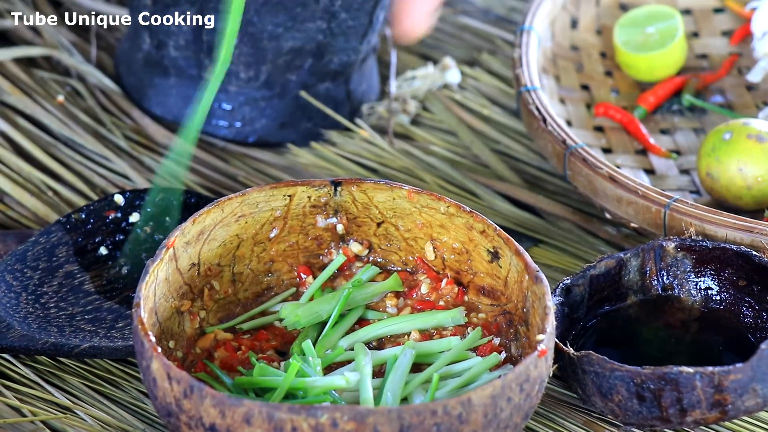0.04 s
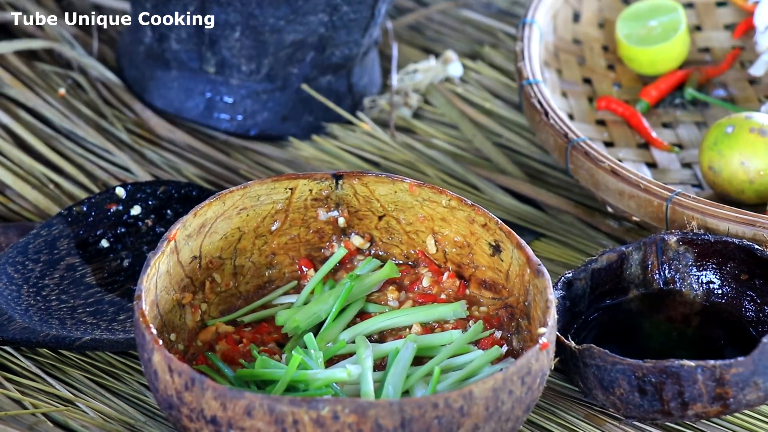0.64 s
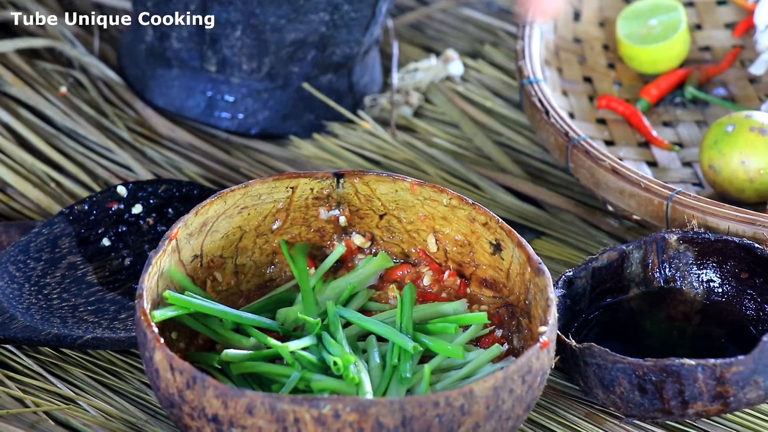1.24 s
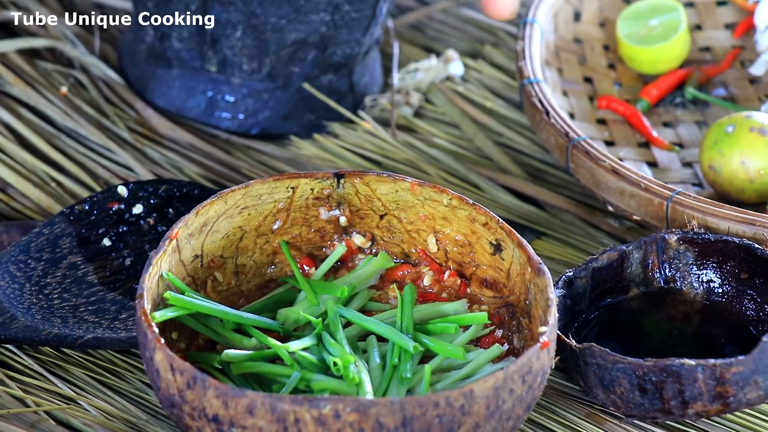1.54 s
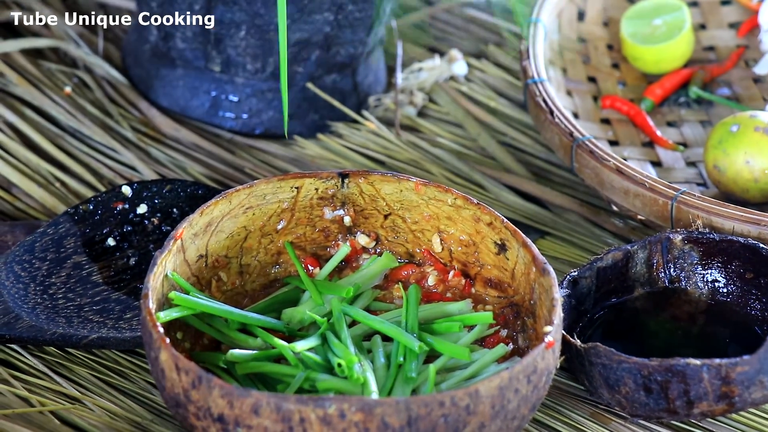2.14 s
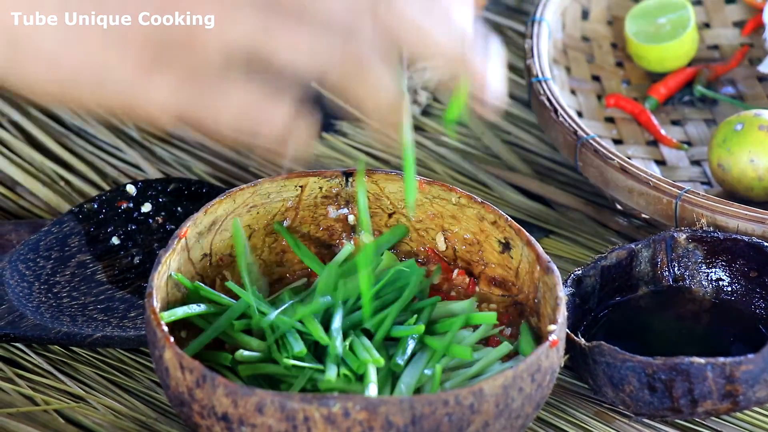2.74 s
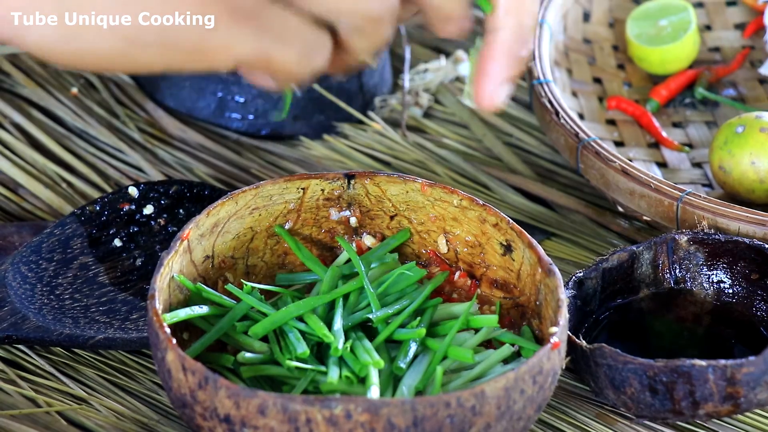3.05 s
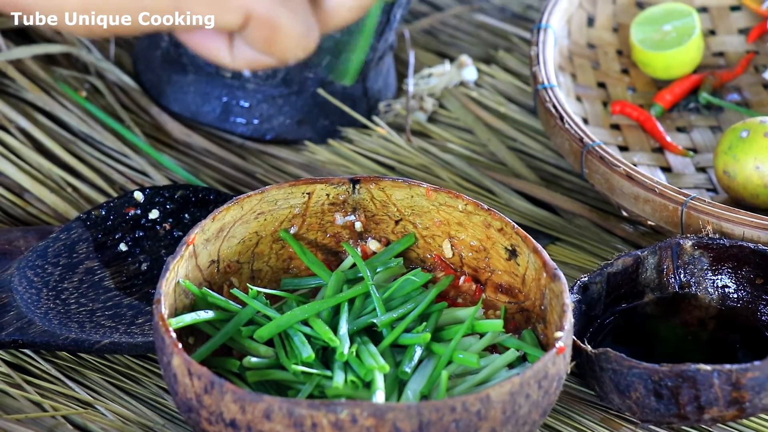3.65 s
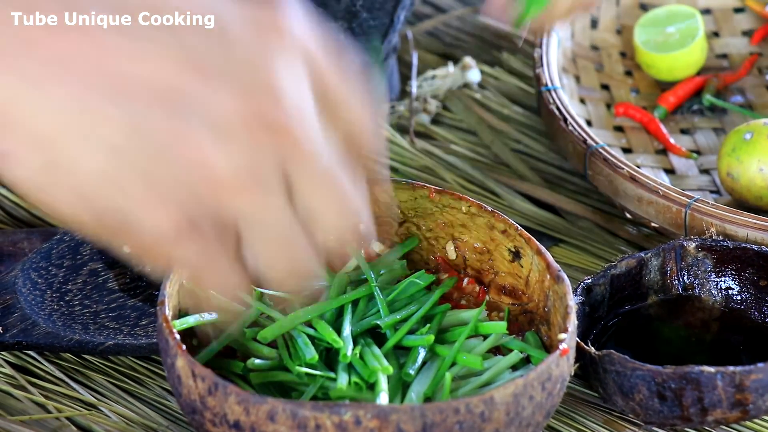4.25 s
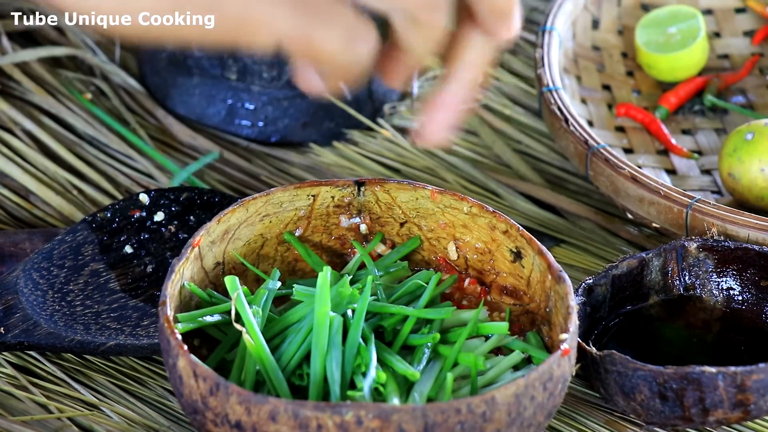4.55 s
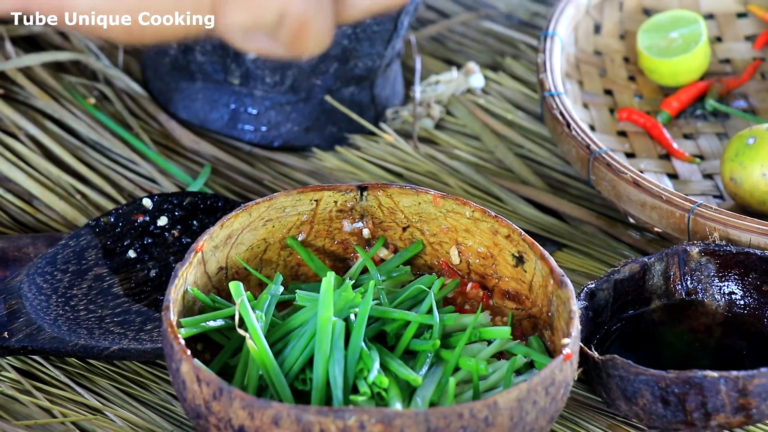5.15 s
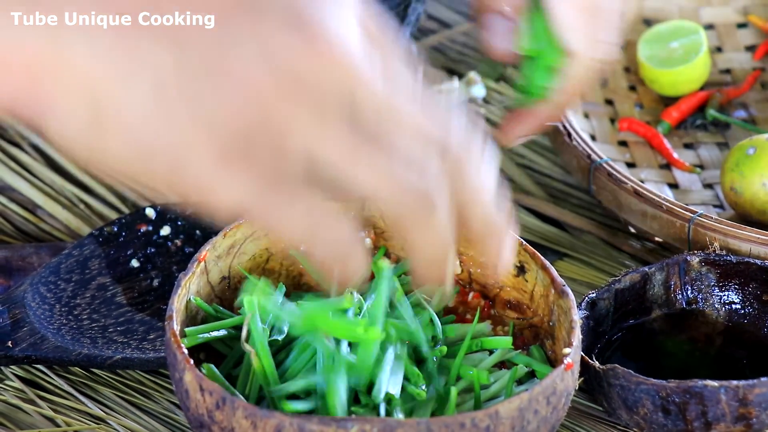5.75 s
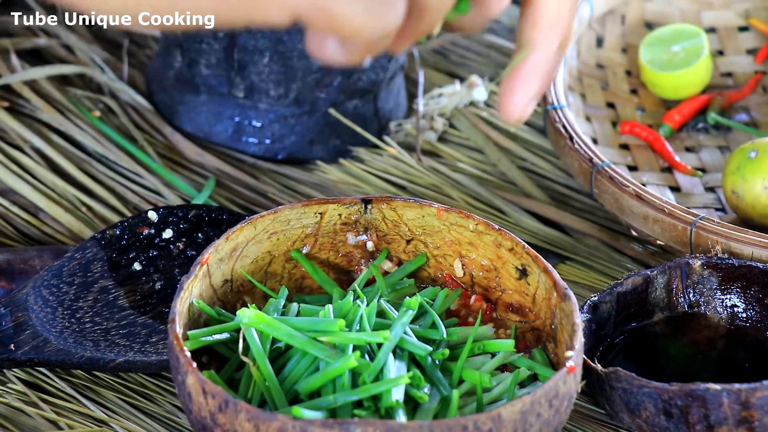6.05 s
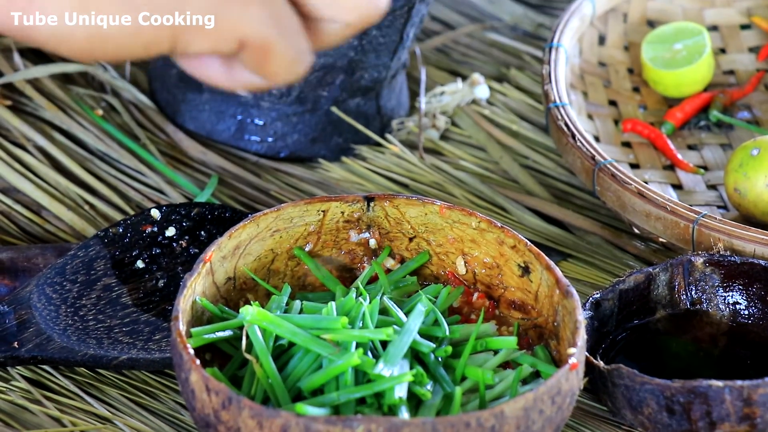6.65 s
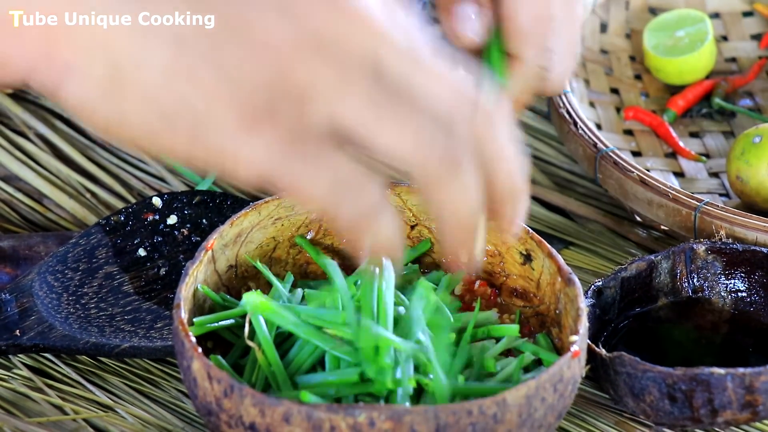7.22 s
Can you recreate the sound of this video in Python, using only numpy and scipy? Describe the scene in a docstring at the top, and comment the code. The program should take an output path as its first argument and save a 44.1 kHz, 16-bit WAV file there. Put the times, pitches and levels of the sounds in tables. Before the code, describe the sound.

A blade slices a hand-held bunch of spring onions outdoors, close to a stereo microphone. Five short cuts come at about 0.5, 1.8, 3.8, 5.1 and 6.7 seconds, each a rasp breaking into bright cracks and small hollow pops. The second crackles on until 2.4 seconds; the fourth carries a slight wet squeak. Between cuts come faint leafy rustles and dull hand bumps. Pieces and the blade tap a coconut-shell bowl on the right, most clearly around 3.4, 4.5, 5.8, 6.6 and 7.2 seconds.

In the trees, slightly right and quieter than the cutting, a songbird warbles and trills through the first 1.2 seconds, then whistles and chirps from 3.2 to 5.2. Another bird pipes evenly from 6.8 seconds. Faint distant chirps and a low breeze continue throughout, with soft puffs on the microphone at the start and around 1.6, 1.9 and 3.5 seconds.

```python
"""Spring onions are sliced in the hand over a coconut-shell bowl, outdoors, close to a stereo microphone.
The blade rasps through the bunch, hollow stalks crackle and snap, and cut pieces tap the shell on the right.
Off in the trees a songbird whistles varied phrases, another pipes, and far birds chatter.
Moving air rumbles softly all around and now and then puffs on the microphone."""
import sys
import numpy as np
from scipy import signal
from scipy.fft import rfft, irfft, next_fast_len
from scipy.io import wavfile
from scipy.ndimage import uniform_filter1d, map_coordinates

SR = 44100
rng = np.random.default_rng(int(sys.argv[2]) if len(sys.argv) > 2 else 0)


def store_pcm(level_fs):
    """Save levels as 16-bit WAV."""
    pcm = np.round(np.clip(level_fs, -1, 1) * 32767).astype(np.int16)
    wavfile.write(sys.argv[1], SR, np.atleast_2d(pcm).T)


N = 329868

# The blade's passes through the bunch, close up: (start [s], length [s], level [dB])
BLADE_PASSES = [(.497, 0.26, -39.5), (1.805, 0.29, -45), (3.774, .27, -44.5), (5.111, .22, -45),
                (6.675, 0.21, -50.5)]
# Soft hissy swells between cuts, leaf rustle and, near 3.26 s, a bird's high twitter:
# (middle [s], length [s], level [dB])
HISSY_SWELLS = [(.27, .16, -49), (1.04, 0.045, -47), (1.42, 0.18, -46.5), (1.66, .08, -50),
                (2.66, 0.12, -50.5), (3.26, 0.14, -46.5), (3.66, 0.22, -50), (5.44, 0.11, -50),
                (6.35, .07, -49)]
# Faint rustle of the held bunch: (time [s], level [dB])
HAND_RUSTLE = [(0, -56.5), (.9, -52.5), (1.4, -58.5), (4.7, -58.5), (7.48, -62.5)]
# Tearing cells: (frequency [Hz], level [dB])
RASP_SPECTRUM = [(300, -4.5), (900, -16.5), (2500, 4), (4800, -2), (7000, 2.5), (9000, 1.5), (12000, -2.5),
                 (16000, -11)]

def rasp(bite_s=0.081, ease_db_per_s=12.5, ruptures_per_s=1400):
    """The blade tears cells in clumps of tiny ruptures; a softer hiss swells between passes."""
    t = np.arange(N) / SR
    force = np.maximum(amp(curve(HAND_RUSTLE)), swells(HISSY_SWELLS))
    for start, length, db in BLADE_PASSES:
        contact = np.clip(np.minimum(t - start, start + length - t) / bite_s + .5, 0, 1)
        drag = amp(db - ease_db_per_s * np.clip(t - start, 0, length))
        force = np.maximum(force, contact * drag)
    sizes = spread(noise(), 0.28) * amp(2.8 * np.clip(rng.standard_normal(N), -2, 2))
    ruptures = unit(sizes * (rng.random(N) < ruptures_per_s / SR))
    grains = amp(-8) * ruptures + amp(-3.5) * spread(noise(), 0.34)
    clumps = amp(2.7 * wobble(260) + 1.7 * wobble(50))
    return amp(6) * force * coloured(grains * clumps, RASP_SPECTRUM) * pan(-1.6)


def crackles(per_s=45, boost_db=18.5, growth_db=6.5, scatter_db=3.5, crumble_db=-18):
    """Thin stalks give way at random, harder as the blade sinks in: rows like STALK_SNAPS."""
    rows = []
    for start, length, db in BLADE_PASSES:
        chance = rng.standard_normal((40, 3))
        count = round(length * per_s)
        for k, (slip, size, hollow) in enumerate(chance[:count]):
            depth = (k + .5 + 0.28 * slip) / count
            level = db + boost_db + growth_db * depth + scatter_db * size
            rows.append((start + depth * length, level, -17 + 6 * hollow, crumble_db))
    return rows


# Thick stalks snapping just in front of the microphone: (time [s], level [dB], pop [dB], crumble [dB])
STALK_SNAPS = [(0.5572, -14.5, -4.5, -22), (0.6198, 5.5, -20, -36), (0.659, -16, -21, -24),
               (0.682, -6.5, -35, -36), (.687, -7.5, -36, -19), (0.7165, -11.5, -30, -10),
               (.726, -5, -40, -21), (.7372, -15.5, -9, -10.5), (0.7431, -2, -24, -16),
               (1.628, -12, -14, -17), (1.9657, -16, -9.5, -15), (2.0295, -24.5, -6.5, -13),
               (2.045, -4, -23, -26), (2.0842, -5, -34, -27), (2.1, -10, -34, -14.5),
               (2.1073, -3.5, -45, -40), (2.1157, -2.5, -29, -23.5), (2.1605, -6, -24, -24.5),
               (2.2905, -20.5, -13, -13.5), (2.2989, -13, -17, -25), (2.3433, -17, -28, -12),
               (2.3622, -5.5, -36, -17.5), (2.367, -9.5, -38, -16.5), (2.3729, -10.5, -14, -17),
               (3.873, -13, -25, -20), (3.9724, -4, -45, -21), (3.9888, -14.5, -19, -11),
               (4.006, -11.5, -37, -17), (4.028, -14, -25, -18), (4.0329, -4.5, -19.5, -23.5),
               (5.244, -8, -34, -22), (5.366, -17, -33, -21), (5.3775, -13, -33, -22),
               (5.409, -22.5, -27, -11), (5.4258, -1, -35, -20), (5.4314, -2.5, -31, -21.5),
               (6.737, -24.5, -9.5, -12), (6.8362, -22.5, -22, -14.5), (6.89, -11.5, -27, -30),
               (6.913, -5, -39, -31)]
# The bright crack: (frequency [Hz], level [dB])
CRACK_SPECTRUM = [(400, -10.5), (1200, -16.5), (3000, -4.5), (4800, -5), (6500, 2), (8300, 4.5),
                  (11000, -3.5), (16000, -7.5)]
# The hollow pop: (frequency [Hz], level [dB])
POP_SPECTRUM = [(300, -25.5), (800, -2.5), (1300, 3), (3000, 2), (5000, -8), (10000, -11.5)]

def snaps():
    """Each stalk gives way with a bright crack, and its hollow tube adds a lower pop."""
    out = np.zeros((2, N))
    crack, pop = impulse(CRACK_SPECTRUM), impulse(POP_SPECTRUM)
    for s, db, pop_db, crumble_db in STALK_SNAPS + crackles():
        click = crack + amp(pop_db + 6.5) * pop
        push = fracture(t60=0.035, crumble_db=crumble_db, alike=0.29, lead_in_s=0.0037)
        burst = amp(db - 1.5) * signal.fftconvolve(push, click[None])
        add(out, s - .0094, burst, pan_db=rng.normal(-0.5, 2))
    return out


def fracture(t60, crumble_db, alike, lead_in_s):
    """One sharp push, 10 ms in, amid a crumble of tiny ones that builds up and dies away."""
    t = (np.arange(SR // 12) - SR // 100) / SR
    swell_db = -60 * np.where(t < 0, -t / lead_in_s, t / t60)
    push = spread(noise(len(t)), alike)
    push *= amp(crumble_db + swell_db + 5.2 * rng.standard_normal(len(t)))
    push[:, t == 0] += 1
    return push


# Cut pieces and the blade tapping the bowl, close on the right: (time [s], level [dB], knock [dB])
BOWL_TAPS = [(.2217, -20.5, -27), (2.482, -25.5, -16), (3.265, -12.5, -19.5), (3.4165, -8, -24.5),
             (3.4873, -26.5, -4), (3.5085, -17.5, -19), (4.4572, -14, -39), (4.5063, -2.5, -20),
             (5.5653, -26, -36), (5.8034, -7, -19.5), (6.214, -38.5, 1), (6.238, -24, -21),
             (6.6222, -11, -23.5), (6.6966, -12, -14), (6.7058, -15, -23), (6.782, -34.5, -3),
             (7.203, -15.5, -19.5), (7.2459, -19.5, -23)]
# The tick of contact: (frequency [Hz], level [dB])
TICK_SPECTRUM = [(300, -13.5), (1500, -10.5), (4000, -6.5), (7000, 0), (11500, 1), (16000, -6.5)]
# Modes of the coconut shell: (frequency [Hz], level [dB], t60 [s])
SHELL_MODES = [(260, -11, 0.023), (2250, -22, 0.014), (2570, 1, 0.015), (2940, 2, 0.012), (3750, -5, 0.011)]

def taps(blur_rad=.22):
    """A light contact ticks and briefly rings the shell; the full bowl has no clear pitch."""
    out, t = np.zeros((2, N)), np.arange(SR // 12) / SR
    tick = impulse(TICK_SPECTRUM)
    for s, db, knock_db in BOWL_TAPS:
        ring = np.zeros(len(t))
        for hz, level, t60 in SHELL_MODES:
            decay = amp(level + rng.normal(0, 1) - 60 * t / t60)
            phase = 2 * np.pi * hz * rng.normal(1, 0.039) * t
            drift = np.cumsum(rng.normal(0, blur_rad, len(t)))
            ring += decay * np.sin(phase + drift)
        push = fracture(t60=0.018, crumble_db=-8.5, alike=0.1, lead_in_s=0.0016)
        add(out, s - .0094, amp(db - 7.5) * signal.fftconvolve(push, tick[None]))
        add(out, s + 0.00077, amp(db + knock_db + 6) * ring)
    return from_right(out, pan_db=-9)


# The blade dragging on a wet stalk, close up: (middle [s], length [s], level [dB])
WET_DRAGS = [(5.26, 0.18, -46)]
# The squeak's resonances: (frequency [Hz], width [Hz], level [dB])
SQUEAK_BANDS = [(1490, 90, -1), (3610, 160, 0), (4080, 200, -3)]

def squeak():
    """A wet stalk sticks and slips on the blade, exciting a few narrow resonances."""
    def resonances(hz):
        return sum(amp(db) * 1j * hz * width / (centre ** 2 - hz ** 2 + 1j * hz * width)
                   for centre, width, db in SQUEAK_BANDS)
    slips = spread(noise(), 0.46) * amp(2.7 * wobble(200))
    return from_right(unit(filtered(slips, resonances)) * swells(WET_DRAGS), pan_db=-2)


# Top treble of the cutting at the microphone: (time [s], gain [dB])
CUTTING_BRIGHTNESS = [(0, 2), (.75, -4), (2.2, 3), (3.25, -7), (3.8, 1), (5.3, 2.5), (5.8, 0), (7.48, 4)]

def vary_brightness(x):
    """The cutting's top treble grows duller and brighter over time."""
    top = filtered(x, lambda hz: np.clip((hz - 8500) / 3000, 0, 1))
    return x + (amp(curve(CUTTING_BRIGHTNESS)) - 1) * top


# Soft bumps of the hands, close and central: (time [s], level [dB], pitch [Hz], t60 [s])
HAND_BUMPS = [(1.19, -28, 149, 0.062), (1.953, -32, 391, 0.16), (3.312, -27, 237, 0.047),
              (3.486, -25.5, 316, 0.078), (4.508, -34.5, 260, 0.021), (5.478, -32.5, 264, 0.054),
              (5.805, -32.5, 306, 0.042), (6.698, -42, 328, 0.039)]
# A bump's shudder: (frequency [multiple of the pitch], level [dB])
SHUDDER_SPECTRUM = [(.25, 22), (.6, 3), (1, -1), (1.6, 7), (3, -2), (8, -4), (20, -36)]

def bumps():
    """Dull, heavily damped knocks as the hands shift their grip."""
    out, t = np.zeros((2, N)), np.arange(SR // 8) / SR
    hz = np.fft.rfftfreq(len(t), 1 / SR)
    for s, db, pitch_hz, t60 in HAND_BUMPS:
        colour = amp(along([(k * pitch_hz, level) for k, level in SHUDDER_SPECTRUM], hz))
        shudder = unit(irfft(rfft(spread(noise(len(t)), 0.86)) * colour, len(t)))
        push = np.sin(2 * np.pi * pitch_hz * t) * np.exp(-t * pitch_hz / 2)  # dies in a few cycles
        attack = 1 - np.exp(-t / 0.0015)
        thud = (push + shudder * amp(-60 * t / t60)) * attack
        add(out, s, amp(db + 4.5) * thud / np.abs(thud).max())
    return out


TRILL_S, TWITTER_S, PEW_S, VERSE_S, PIPE_S = .068, .036, .2, .182, .239  # from note to note
# Two birds in the trees, a little to the right:
# (start [s], syllable, notes [count], spacing [s], level [dB], pitch [ratio])
BIRD_PHRASES = [(0.042, "warble", 1, 0, -32, 0.99), (.4, "fall", 1, 0, -36.5, 0.98),
                (.402, "blip", 1, 0, -47.5, 5.4), (0.505, "chip", 11, TRILL_S, -39.5, 1),
                (2.78, "fall", 1, 0.0043, -59.5, 1.2), (3.165, "tsip", 2, TWITTER_S, -49.5, 1.05),
                (3.275, "tsip", 1, 0, -45, 0.88), (3.389, "rise", 1, 0, -40, .99),
                (3.84, "pew", 3, PEW_S, -34.5, 0.96), (4.363, "tsip", 4, VERSE_S, -39.3, 1.05),
                (4.449, "chip", 4, VERSE_S, -39.5, .84), (4.479, "chip", 4, VERSE_S, -42, 0.82),
                (5.11, "buzz", 1, 0, -34, .96), (6.762, "pipe", 3, PIPE_S, -44.5, 0.98),
                (7.445, "pipe", 1, 0, -47, .97)]
# Each syllable's glide, by name: (time [s], pitch [Hz], level [dB])
GLIDES = { "warble": [(0, 2890, -24), (.02, 3075, 3.5), (.043, 2183, -6), (.063, 2940, 1), (.084, 2126, -3),
          (.105, 2895, -3.5), (.125, 2000, -8)], "fall": [(0, 4100, -17), (.015, 4150, 3), (.03, 3900, 4),
          (.05, 3200, 7.5), (.068, 2750, 5.5), (.08, 2700, -34)], "rise": [(0, 2085, -8), (.03, 2245, 6),
          (.05, 2700, 7.5), (.068, 2960, 7), (.08, 3020, 4)], "buzz": [(0, 3120, -16), (.025, 3480, -2.5),
          (.045, 4140, 2), (.065, 4450, -1), (.08, 4260, -22)], "chip": [(0, 3230, 1), (.005, 2480, 5),
          (.013, 1950, -3), (.024, 1560, -16)], "pew": [(0, 3830, -20), (.005, 4670, -4), (.008, 3500, -12),
          (.011, 3200, 3), (.025, 2230, 1.5), (.038, 2190, -2), (.058, 2310, 2), (.068, 2400, -24)],
          "tsip": [(0, 4260, 1), (.012, 8110, -5.5), (.022, 6030, 6), (.04, 5100, -0.5), (.05, 4980, 3)],
          "blip": [(0, 850, -10), (.012, 960, 12.5), (.028, 1120, -11)], "pipe": [(0, 2028, -16),
          (.03, 2153, 2), (.06, 2085, 2), (.088, 2072, -25)]}
# Each syllable's roughness, by name: (flutter [0-1])
FLUTTER = {"warble": .2, "fall": .15, "rise": .1, "chip": .68, "pew": .14, "tsip": .88, "pipe": .08, "buzz":
           .68, "blip": .85}

def birds():
    """The singers repeat each syllable at an even pace; leaves scatter and blur their notes."""
    song = np.zeros((2, N))
    for start, name, count, period, db, ratio in BIRD_PHRASES:
        for k in range(count):
            gain = amp(db + rng.normal(0, 0.39))
            note = whistle(GLIDES[name], ratio * rng.normal(1, .006), FLUTTER[name])
            add(song, start + k * period, gain * note)
    direct = filtered(song, lambda hz: amp(along([(4500, 0), (6000, -1), (8000, -7)], hz)))
    scattered = amp(-4) * echo(song, stretch=0.23) + amp(-6) * echo(song)
    return (direct + scattered) * pan(-4)


def whistle(glide, ratio, rough):
    """A bird's tone glides through a syllable; flutter smears part of it into a narrow band."""
    s, hz, db = np.transpose(glide)
    t = np.arange(int(s[-1] * SR)) / SR
    pitch = uniform_filter1d(np.interp(t, s, hz), size=260, mode="nearest") * ratio
    cycles = np.cumsum(pitch) / SR
    phase = 2 * np.pi * cycles
    flutter = [map_coordinates(knots, [cycles / 5], mode="wrap") for knots in noise(256)]
    tone = np.sqrt(1 - rough ** 2) * np.sin(phase)
    smear = (flutter[0] * np.sin(phase) + flutter[1] * np.cos(phase)) / np.sqrt(2)
    fade = np.clip(np.minimum(t, t[-1] - t) / 0.0021, 0, 1)
    return fade * amp(np.interp(t, s, db)) * (tone + rough * smear)


# The nearer of the far birds' calls: (time [s], level [dB], pitch [ratio])
DISTANT_CALLS = [(.322, -46, 1.88), (1.255, -48, .8), (1.94, -44, 1.62), (2.99, -49, 1.9), (3.115, -50, 1),
                 (5.895, -50, .91), (5.98, -50, .83), (6.38, -49, 1.78), (7.175, -50, 1)]

def far_birds(count=240):
    """Short calls scattered through the distance, most of them faint."""
    calls = np.zeros((2, N))
    for s, db, ratio in DISTANT_CALLS:
        add(calls, s, amp(db) * whistle(GLIDES["blip"], ratio, FLUTTER["blip"]))
    for when, pitch, size, kind in rng.random((count, 4)):
        rising = whistle(GLIDES["blip"], .65 * 4.2 ** pitch, rough=.9)
        call = rising if kind < .7 else rising[::-1]
        add(calls, when * N / SR, amp(-60 + 7 * size) * call)
    return from_right(calls + amp(-2.5) * echo(calls, stretch=0.5), pan_db=-3.5)


# Decay among the surrounding trees: (frequency [Hz], t60 before stretch [s])
TREE_DECAY = [(300, 0.049), (2500, 0.26), (10000, 0.28)]

def echo(x, stretch=1):
    """Scattered answers of trunks and leaves, each frequency dying at its own speed."""
    hz, t, bands = signal.stft(noise(SR // 2), SR, nperseg=256)
    t60 = stretch * along(TREE_DECAY, hz)[:, None]
    tail = signal.istft(bands * amp(-60 * t / t60), SR, nperseg=256)[1]
    return signal.fftconvolve(x, tail / np.linalg.norm(tail[0]), axes=1)[:, :N]


# The breeze all around: (time [s], level [dB])
BREEZE_LEVEL = [(0, -46.5), (1.1, -46.5), (2.4, -46.5), (4.2, -49), (5.05, -46.5), (5.7, -48.5),
                (7.1, -43.5)]
# Puffs on the microphone, from the right: (middle [s], length [s], level [dB])
MIC_PUFFS = [(.11, 0.1, -36), (.26, 0.15, -40), (1.58, 0.2, -42.5), (1.92, 0.14, -38.5), (3.47, .14, -40),
             (3.59, 0.11, -41.5), (3.92, .08, -43.5)]
# Moving air: (frequency [Hz], level [dB])
RUMBLE_SPECTRUM = [(13, -31), (22, -24), (48, -2), (81, 2.5), (342, -12), (400, -29), (520, -91),
                   (880, -120)]
# The distant countryside: (frequency [Hz], level [dB])
HUSH_SPECTRUM = [(60, 5), (250, 1), (450, 2.5), (800, 1.5), (1300, -0.5), (2500, -3), (3900, -3.5),
                 (4900, -13.5), (8000, -11), (12000, -21.5), (16000, -25)]

def air():
    """Moving air makes a lumpy rumble and puffs on the microphone, under an even country hush."""
    rumble = diffuse(coloured(noise(), RUMBLE_SPECTRUM)) * amp(curve(BREEZE_LEVEL) + 2.05 * wobble(12))
    buffeting = coloured(spread(noise(), .25), RUMBLE_SPECTRUM)
    puffs = from_right(buffeting, pan_db=-11) * swells(MIC_PUFFS)
    hush = diffuse(coloured(noise(), HUSH_SPECTRUM)) * amp(-44.5 + 0.14 * wobble(4.4))
    return rumble + puffs + hush


# Left-right likeness of the open air: (frequency [Hz], correlation [0-1])
AIR_LIKENESS = [(60, 0.75), (250, 0.97), (450, 0.53), (1000, 0.56), (2000, 0.33), (4000, 0.11),
                (7000, 0.16), (15000, .15)]
# Its lean to one side: (frequency [Hz], left minus right [dB])
AIR_LEAN = [(30, -15), (80, -2), (180, -3.5), (350, 0.5), (550, -6), (900, -2.5), (1600, -6), (2600, -10),
            (5000, -6.5), (9000, 0), (15000, 3)]

def diffuse(x):
    """Sound from all around reaches the two microphones alike in the bass, less so in the treble."""
    hz = np.fft.rfftfreq(N, 1 / SR)
    spectrum = spread(rfft(x), along(AIR_LIKENESS, hz)) * pan(along(AIR_LEAN, hz))
    return unit(from_right(irfft(spectrum, N), pan_db=1.5))


def from_right(x, pan_db, lag_s=.00021):
    """Sound from the right reaches the left microphone late; pan_db sets the balance."""
    return np.array([np.roll(x[0], round(lag_s * SR)), x[1]]) * pan(pan_db)


def pan(db):
    """Stereo gains, left minus right in dB."""
    return amp(np.array([[.5], [-.5]]) * db)


def spread(pair, alike):
    """Two unrelated signals mixed to a left-right likeness."""
    turn = np.arccos(np.clip(alike, -1, 1)) / 2
    mid, side = pair[0] * np.cos(turn), pair[1] * np.sin(turn)
    return np.array([mid + side, mid - side])


def add(out, s, sound, pan_db=0):
    """Mix a sound into a stereo track at time s."""
    start = max(round(s * SR), 0)
    part = (sound * pan(pan_db))[:, :max(N - start, 0)]
    out[:, start:start + part.shape[1]] += part


def amp(db):
    return 10 ** (np.asarray(db) / 20)


def unit(x):
    return x / np.sqrt(np.mean(x ** 2) + 1e-20)


def noise(samples=N):
    return rng.standard_normal((2, samples))


def along(points, hz):
    """(Hz, value) points interpolated on a log axis."""
    frequencies, values = np.transpose(points)
    return np.interp(np.log(hz + 1), np.log(frequencies + 1), values)


def curve(rows):
    """(time, value) points joined into one value per sample."""
    return np.interp(np.arange(N) / SR, *np.transpose(rows))


def swells(rows):
    """Bell-shaped gains, each 9 dB down half its length from its middle."""
    t = np.arange(N) / SR
    return sum(amp(db) * np.exp(-(2 * (t - middle) / length) ** 2) for middle, length, db in rows)


def wobble(rate):
    """A smooth random curve, rate knots a second."""
    return map_coordinates(rng.standard_normal(int(N * rate / SR) + 4), [np.arange(N) * rate / SR])


def filtered(x, response):
    """x through a response given as a function of frequency."""
    size = next_fast_len(N + SR // 2)
    return irfft(rfft(x, size) * response(np.fft.rfftfreq(size, 1 / SR)), size)[..., :N]


def coloured(x, spectrum):
    """Noise given a spectrum, at rms 1."""
    return unit(filtered(x, lambda hz: amp(along(spectrum, hz))))


def impulse(spectrum, size=512):
    """The sharpest causal click with this spectrum, peak 1."""
    cepstrum = irfft(np.log(amp(along(spectrum, np.fft.rfftfreq(size, 1 / SR)))))
    cepstrum[1:size // 2] *= 2
    cepstrum[size // 2 + 1:] = 0
    click = irfft(np.exp(rfft(cepstrum)))
    return click / np.abs(click).max()


def scene():
    """The cutting is close to the microphone and nearly dry; birds and air surround it."""
    cutting = vary_brightness(snaps() + taps() + rasp() + squeak()) + bumps()
    return cutting + amp(-11.5) * echo(cutting, stretch=0.43) + birds() + far_birds() + air()


def record(dry, top_hz=16100):
    """Full scale clips the peaks; nothing is kept above the band limit."""
    return filtered(np.clip(dry, -1, 1), lambda hz: hz < top_hz)


dry = scene()
out = record(dry)
store_pcm(out)
```